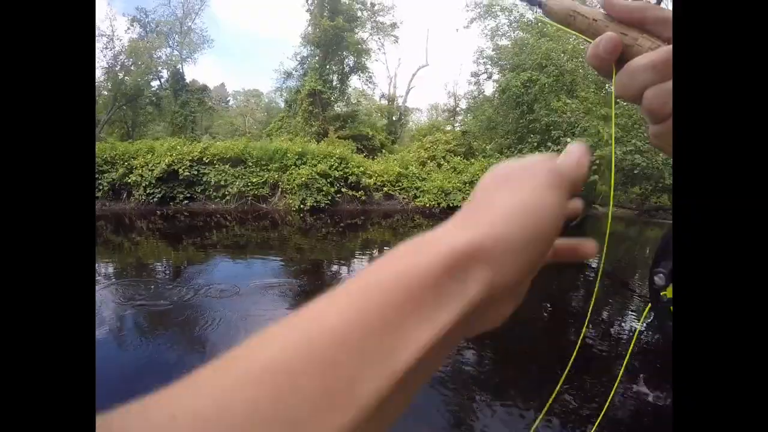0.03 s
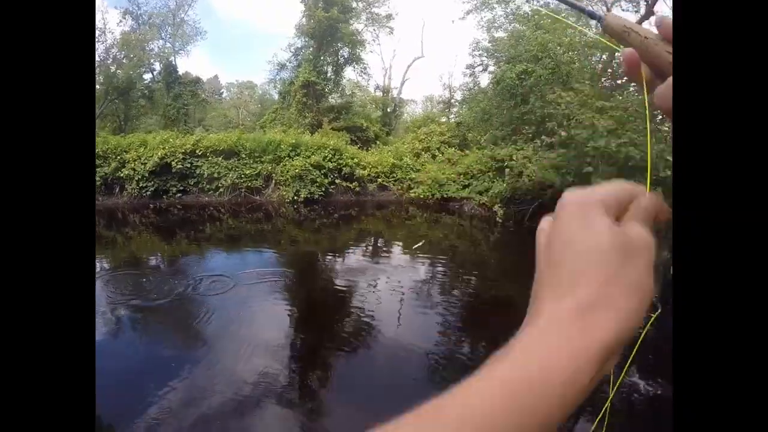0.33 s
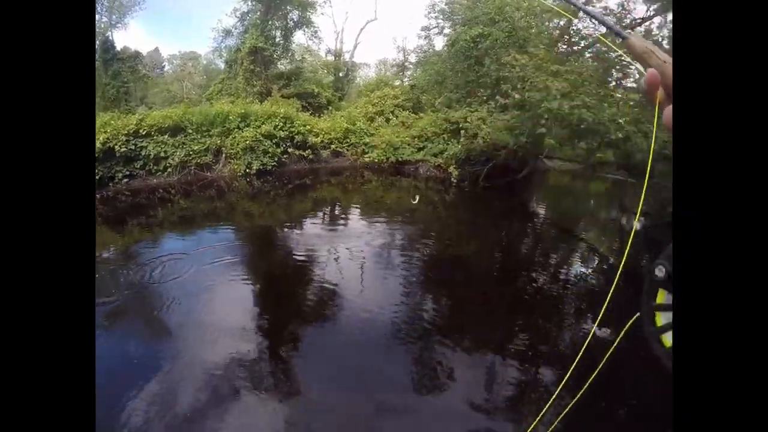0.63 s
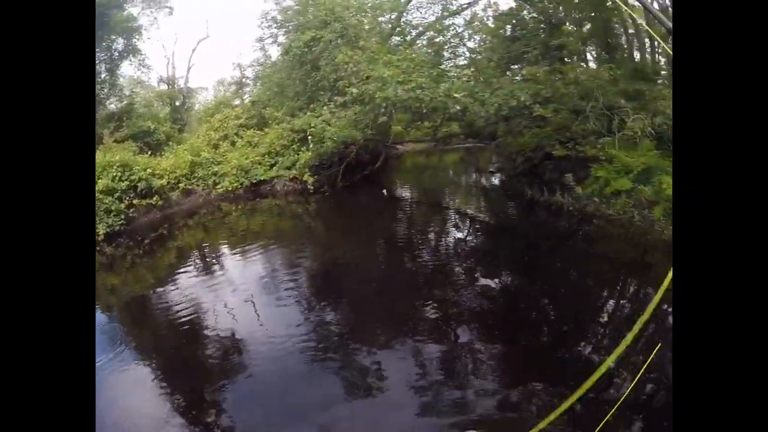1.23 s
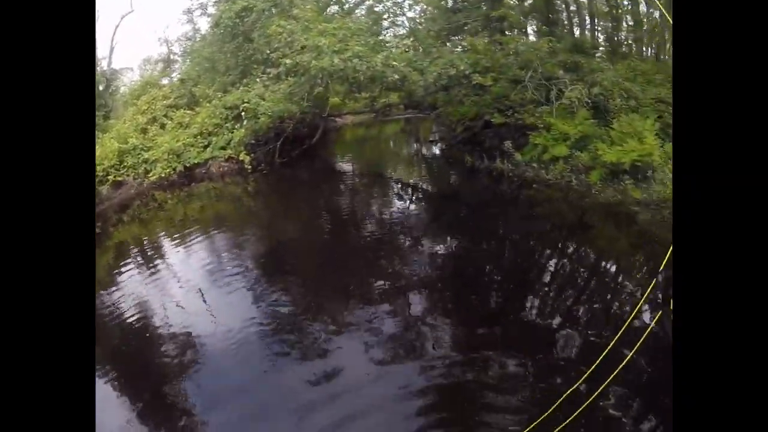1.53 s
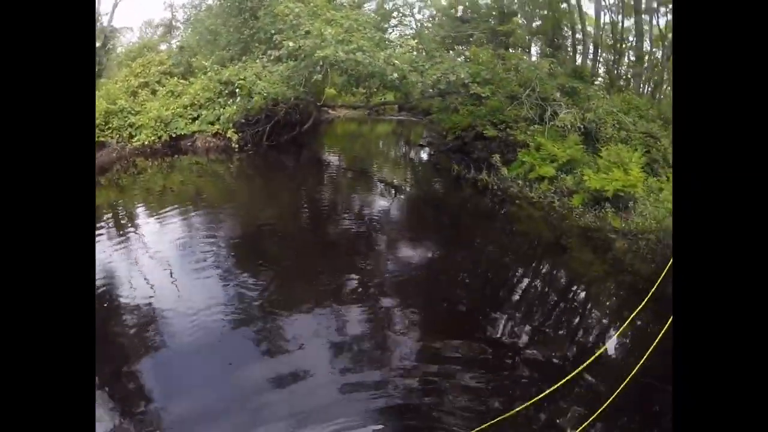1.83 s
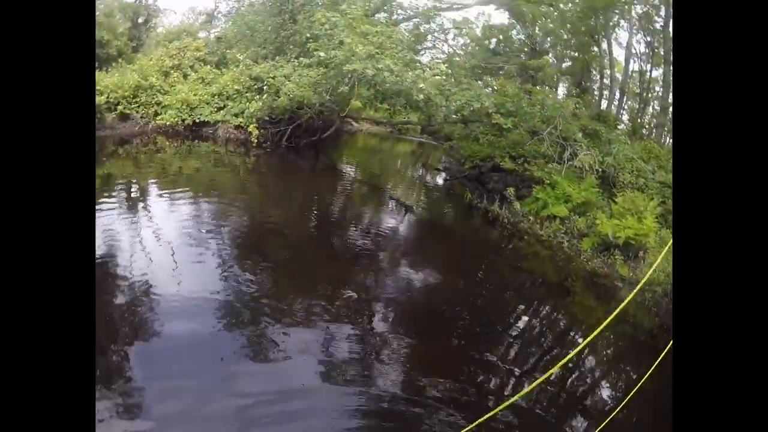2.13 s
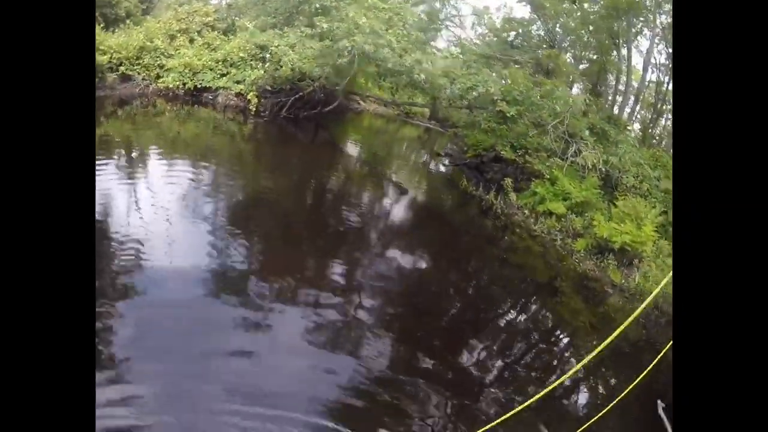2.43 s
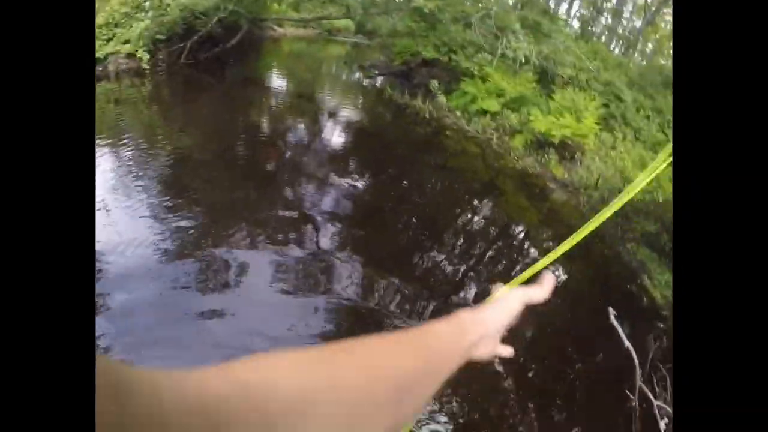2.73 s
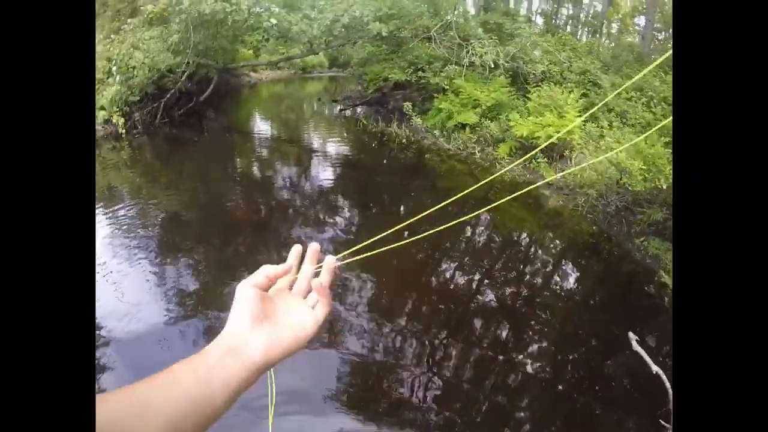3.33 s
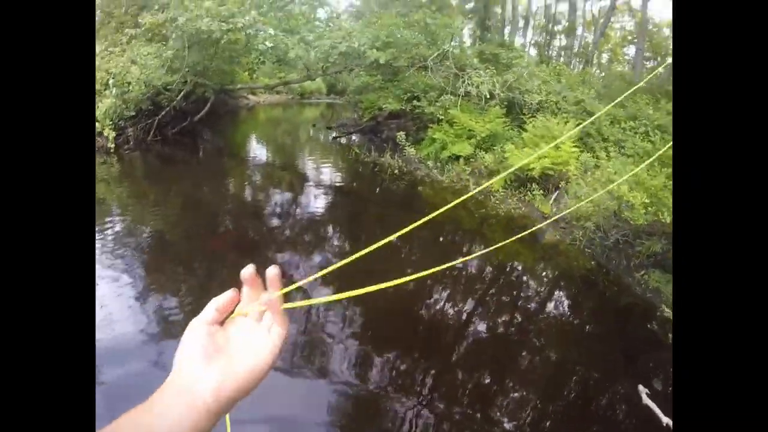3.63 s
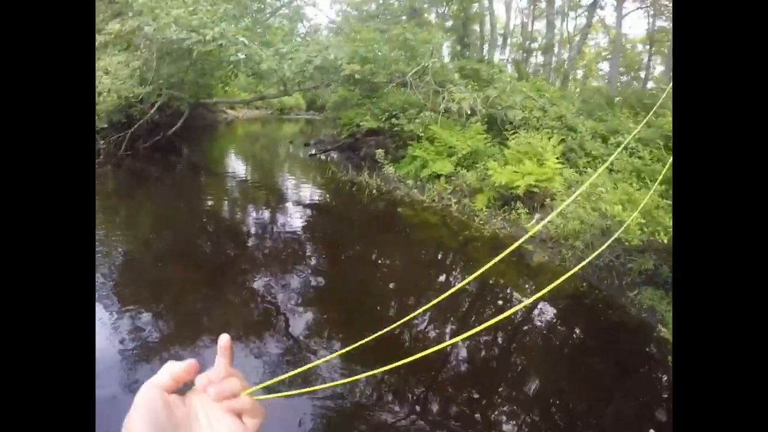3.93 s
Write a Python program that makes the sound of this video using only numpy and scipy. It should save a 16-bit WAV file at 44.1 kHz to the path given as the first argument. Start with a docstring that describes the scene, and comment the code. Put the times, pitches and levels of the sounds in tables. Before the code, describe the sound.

Low thumps and cloth scrapes on a body-worn camera, with soft water behind.

```python
"""Beside a slow stream, an angler handles a fly line, heard from a cased camera worn on the chest.
Body movement and puffs of air thump the case; clothing rubs, scrapes and knocks on it and rings its walls.
The line zips through the fingers and ticks, and a catch on the tackle snaps once.
Behind it all lie a soft wash of water, ringing drips and small bubbles, and a faint whistling bird."""
import sys
import numpy as np
from scipy import signal
from scipy.fft import rfft, irfft, next_fast_len
from scipy.io import wavfile
from scipy.ndimage import uniform_filter1d

SR = 44100
rng = np.random.default_rng(int(sys.argv[2]) if len(sys.argv) > 2 else 0)


def generate_wav(sig):
    """Save sig (samples, or channels by samples) to the path in sys.argv[1] as 16-bit PCM at SR."""
    pcm = np.round(np.clip(np.atleast_2d(sig).T, -1, 1) * 32767).astype(np.int16)
    wavfile.write(sys.argv[1], SR, pcm)


N = 176400

# ring of the case walls under sliding cloth (frequency [Hz], relative level [dB])
CASE_RING = [(150, -29.5), (260, -6), (370, -10), (470, -9), (620, -4), (730, -8.5), (1000, -3),
             (1300, -10.5), (1560, -16), (1800, -7), (2050, 3.5), (2300, 2), (2500, 2), (2780, -12.5),
             (3050, -9.5), (3400, -17), (3850, -18.5), (4150, -11.5), (4400, -19.5), (4800, -5.5),
             (5120, -11), (5380, -28), (5700, -10.5), (6200, -16.5), (6800, -21.5), (7400, -34),
             (8050, -22.5), (8700, -40), (9400, -32), (10050, -25.5), (11000, -35), (12400, -37),
             (15500, -69)]


def undb(db):
    """Decibels to gain."""
    return 10 ** (np.asarray(db) / 20)


def unit(x):
    """Scale to rms 1."""
    return x / np.sqrt(np.mean(x ** 2))


def clock():
    """Time of every sample, in seconds."""
    return np.arange(N) / SR


def fader(points):
    """Gain ride through (time [s], level [dB]) points."""
    return undb(np.interp(clock(), *np.array(points).T))


def colour(x, *spectra):
    """Minimum-phase EQ through one or more curves of (frequency [Hz], gain [dB])."""
    size = next_fast_len(len(x) + 4096, real=True) // 2 * 2
    log_hz = np.log(np.maximum(np.arange(size // 2 + 1) * SR / size, 1))
    db = sum(np.interp(log_hz, np.log(eq[:, 0]), eq[:, 1]) for eq in map(np.array, spectra))
    cepstrum = irfft(np.log(undb(db)), size)
    cepstrum[1:size // 2] *= 2  # folded so that the ring follows the hit
    cepstrum[size // 2 + 1:] = 0
    return irfft(rfft(x, size) * np.exp(rfft(cepstrum)), size)[:len(x)]


def noise(spectrum):
    """Steady coloured noise at rms 1."""
    return unit(colour(rng.standard_normal(N), spectrum))


def wander(rate_hz):
    """Smooth random drift at rms 1."""
    hold = max(int(SR / rate_hz), 1)
    steps = np.repeat(rng.standard_normal(N // hold + 1), hold)
    return unit(uniform_filter1d(uniform_filter1d(steps, hold), hold)[:N])


def add(out, start, x):
    """Mix a short sound in at its start time."""
    i = max(int(start * SR), 0)
    out[i:i + len(x)] += x[:max(N - i, 0)]


def slips(per_second=5000, spread_db=3):
    """Friction: fibres stick and slip in dense impulses of very unequal size."""
    impulses = (rng.random(N) < per_second / SR) * rng.choice([-1, 1], N)
    return impulses * undb(spread_db * np.minimum(rng.exponential(size=N), 5))


def strokes(rows, attack_s=0.0031, sag_db=6.5, release_s=0.00425):
    """Envelope of a series of slides: each grabs quickly, sags and lets go."""
    out = np.zeros(N)
    for start, length, db in rows:
        t = clock() - start
        grab = np.clip(t / attack_s, 0, 1)
        sag = undb(-sag_db * np.clip(t / length, 0, 1))
        release = np.exp(-np.maximum(t - length, 0) / release_s)
        out += undb(db) * grab * sag * release
    return out


def blows(rows, spectrum, decay_s, rough):
    """Contacts ring a body: one firm push, then a brief rough scuff."""
    out, t = np.zeros(N), clock()[:SR // 10]
    for start, db in rows:
        scuff = rng.standard_normal(len(t)) * np.exp(-t / decay_s)
        scuff /= np.sqrt(np.sum(scuff ** 2))
        hit = colour((t == 0) + rough * scuff, spectrum)
        strength = np.sqrt(np.sum(hit ** 2) / (decay_s * SR))
        add(out, start, undb(db) * hit / (2 * strength))
    return out


def bubble(hz, cycles, glide=0.042):
    """One bubble rings and rises a little in pitch as it dies."""
    t = clock()[:SR // 20]
    age = t * hz / cycles
    return np.sin(2 * np.pi * hz * t * (1 + glide * np.minimum(age, 2))) * np.exp(-age)


def stream(level_db=-58):
    """The bed: a soft, steady wash of slow water and microphone hiss."""
    # tone of the water and hiss (frequency [Hz], relative level [dB])
    wash = [(100, -3.5), (450, 2.5), (1000, 2.5), (1550, -9), (2200, 5), (2900, -5.5), (4300, -2.5),
            (5800, -8), (8800, -12), (10000, -9), (11500, -13.5), (13500, -9.5), (15500, -17.5)]
    return undb(level_db) * noise(wash)


def bird(waver_depth=0.003, flutter_db=2.5):
    """Thin, nearly steady whistles from the trees."""
    # bird notes (start [s], length [s], start pitch [Hz], end pitch [Hz], level [dB])
    whistles = [(0.31, 0.216, 3400, 3480, -67), (0.45, 0.036, 3470, 3470, -50),
                (.36, 0.206, 5100, 5650, -68), (0.97, 0.44, 3770, 3580, -66.5)]
    out, waver = np.zeros(N), 1 + waver_depth * wander(150.4)
    for start, length, from_hz, to_hz, db in whistles:
        along = np.clip((clock() - start) / length, 0, 1)
        hz = (from_hz + (to_hz - from_hz) * along) * waver
        swell = np.sqrt(2 * np.abs(np.sin(np.pi * along)))
        out += undb(db) * swell * np.sin(2 * np.pi * np.cumsum(hz) / SR)
    return out * unit(undb(flutter_db * wander(89.4)))


def trickle(from_s=1.65, until_s=3.68, per_band=100, spread_db=2.5):
    """Small bubbles ring as the angler turns in the water, and a few clear drips stand out."""
    # bubble bands (centre pitch [Hz], lowest level [dB], decay [cycles])
    bands = [(1001, -51, 6.4), (2192, -51.5, 9.7), (4300, -49.5, 9)]
    # single drips (time [s], pitch [Hz], level [dB])
    drips = [(1.721, 4820, -45), (1.83, 900, -36.5), (1.855, 4300, -40), (3.325, 800, -40.5),
             (3.122, 4330, -45), (3.39, 995, -38.5), (3.602, 4270, -39)]
    out = np.zeros(N)
    for centre_hz, db, cycles in bands:
        for when, pitch, softness in rng.random((per_band, 3)):
            gain = undb(db - spread_db * np.log(max(softness, 1 / 20)))
            hz = centre_hz * np.exp(pitch - 0.5)
            add(out, from_s + when * (until_s - from_s), gain * bubble(hz, cycles))
    for start, hz, db in drips:
        add(out, start, undb(db) * bubble(hz, cycles=6.1))
    return out


def line_zips():
    """The fly line slips through the fingers in short, bright zips."""
    # pulls of the line (start [s], length [s], level [dB])
    pulls = [(.436, 0.021, -46), (.78, 0.086, -57), (.893, .012, -52), (1.07, 0.1, -53),
             (1.195, 0.0069, -46.5)]
    # tone of line on skin (frequency [Hz], relative level [dB])
    zip_tone = [(1500, -23), (2700, -0.5), (3400, 4.5), (3800, -4.5), (5700, -10), (7000, -21),
                (15000, -33)]
    return unit(colour(slips(), zip_tone)) * strokes(pulls)


def tackle_ticks():
    """Line and tackle touch in small, dry ticks."""
    # light contacts (time [s], level [dB])
    ticks = [(1.015, -41), (1.199, -36.5), (1.394, -39.5), (1.526, -40), (1.738, -35), (1.882, -38),
             (1.970, -38), (2.983, -40), (3.636, -34)]
    # ring of a tick (frequency [Hz], relative level [dB])
    tick_tone = [(300, -61.5), (1000, 2), (1550, -4), (2150, 16), (2750, 0), (3600, -4), (4600, -22),
                 (6200, -11.5), (15000, -40)]
    return blows(ticks, tick_tone, decay_s=0.0036, rough=1.6)


def catch_click(at_s=2.7613, ring_db=-30, snap_db=-34.5, snap_decay_s=0.0007):
    """A catch snaps once and the case rings briefly."""
    # modes of the case (frequency [Hz], relative level [dB], decay [s])
    modes = [(1060, 2, 0.0012), (2160, 2.5, 0.0036), (6670, -2, 0.00087), (7800, -4.5, 0.001),
             (10100, -6, 0.00092)]
    out, t = np.zeros(N), clock()[:SR // 20]
    ring = sum(undb(db) * np.sin(2 * np.pi * hz * t) * np.exp(-t / decay) for hz, db, decay in modes)
    snap = rng.standard_normal(len(t)) * np.exp(-t / snap_decay_s)
    add(out, at_s, undb(ring_db) * ring + undb(snap_db) * snap)
    return out


def shirt_rub(flutter_db=2):
    """The shirt brushes the case, and its slipping fibres ring the walls."""
    # ride of the rubbing (time [s], level [dB])
    ride = [(0, -52), (0.5, -53), (0.62, -56), (0.85, -50.5), (0.88, -56.5), (0.99, -61.5), (1.09, -47),
            (1.23, -59.5), (1.33, -50), (1.47, -55), (1.65, -48.5), (1.78, -51), (1.85, -46.5),
            (1.95, -52.5), (2.3, -48), (2.55, -41.5), (2.75, -44.5), (2.81, -52), (2.91, -47.5),
            (3.3, -51.5), (3.46, -49), (3.65, -41.5), (3.8, -44), (3.87, -46), (3.92, -58)]
    # tone of the shirt, on top of the case ring (frequency [Hz], relative level [dB])
    shirt_tone = [(200, -3.5), (600, 4.5), (950, 9), (1500, 12), (2200, 2), (3300, 6.5), (5000, -4.5),
                  (6500, 3), (10000, 2.5), (15000, -7)]
    friction = slips() * undb(flutter_db * wander(60))
    return unit(colour(friction, CASE_RING, shirt_tone)) * fader(ride)


def case_shudder(flutter_db=4):
    """The case drags on cloth with a low, uneven shudder."""
    # ride of the shudder (time [s], level [dB])
    ride = [(0, -50), (0.98, -50.5), (1.08, -36.5), (1.25, -50.5), (1.6, -51), (2.15, -45), (2.3, -30.5),
            (2.46, -30), (2.52, -23.5), (2.59, -33.5), (2.8, -39), (3.1, -37), (3.38, -55), (3.54, -39.5),
            (3.75, -30.5), (3.88, -41), (4, -62)]
    # tone of the dragging case (frequency [Hz], relative level [dB])
    drag_tone = [(45, -18.5), (85, -1), (112, 3), (150, -15.5), (185, -16.5), (255, -15.5), (350, -26.5),
                 (460, -38.5), (800, -61), (4000, -100)]
    drag = rng.standard_normal(N) * undb(flutter_db * wander(30))
    return unit(colour(drag, drag_tone)) * fader(ride)


def cloth_scrapes(flutter_db=1):
    """Cloth scrapes hard across the case in short, gritty strokes."""
    # hard scrapes (start [s], length [s], level [dB])
    scrapes = [(1.037, 0.0089, -39), (1.632, 0.013, -40.5), (1.8145, 0.0028, -28.5), (1.822, 0.013, -41.5),
               (2.257, 0.005, -28), (2.296, 0.0077, -27.5), (2.358, 0.038, -27), (2.440, 0.029, -26),
               (2.492, 0.041, -23), (3.743, 0.042, -37.5), (3.823, 0.015, -33.5)]
    # tone of a scrape, on top of the case ring (frequency [Hz], relative level [dB])
    scrape_tone = [(200, 0.5), (400, 2), (1000, 0.5), (2200, 1.5), (5000, -3.5), (10000, 0.7), (12400, -1),
                   (15000, 17)]
    friction = slips() * undb(flutter_db * wander(250))
    return unit(colour(friction, CASE_RING, scrape_tone)) * strokes(scrapes)


def mount_knocks():
    """Soft knocks on the mount give a dull, short ring."""
    # bumps on the mount (time [s], level [dB])
    knocks = [(0.342, -30.5), (0.63, -36), (1.039, -27), (1.068, -29.5), (1.101, -31.5), (1.145, -32),
              (1.253, -25.5), (1.395, -28), (1.488, -31), (2.297, -30), (2.354, -22), (2.437, -18),
              (2.497, -16.5), (2.909, -28.5), (2.984, -29), (3.04, -33.5), (3.526, -32.5), (3.55, -29),
              (3.815, -27.5)]
    # body of a knock (frequency [Hz], relative level [dB])
    knock_tone = [(60, -14.5), (130, 4.5), (185, -2), (255, 5.5), (340, -4), (450, -18.5), (600, -14.5),
                  (750, -21.5), (1000, -18), (2400, -32.5), (12000, -65)]
    return blows(knocks, knock_tone, decay_s=0.0066, rough=0.8)


def case_thumps(rumble_db=-26.5, flutter_db=-15, flutter_ref_hz=35.2, fall_over_rise=1.12):
    """Each jolt briefly swings the air in the case and makes it flutter, over a steady rumble."""
    # jolts (peak time [s], swing level [dB], pitch [Hz], rise time [s])
    jolts = [(0.078, -13, 26.6, 0.026), (0.218, -10, 27.6, 0.026), (0.482, -16, 42.8, 0.049),
             (0.832, -15.5, 29.2, 0.044), (1.086, -7.5, 66.3, 0.0083), (1.416, -8, 25.8, 0.034),
             (1.678, -10.5, 46.2, 0.028), (2.016, -7.5, 32.2, 0.03), (2.264, -9, 41.2, 0.017),
             (2.502, -4, 33.2, 0.015), (2.54, -12.5, 109, 0.022), (2.621, -5.5, 22.1, 0.031),
             (2.887, -13, 46.3, 0.015), (3.232, -5.5, 29.2, 0.021), (3.5, -7, 46.1, 0.013),
             (3.736, -13, 32.5, 0.041), (3.814, 0, 26.3, 0.021)]
    # rumble of harness and air (frequency [Hz], relative level [dB])
    rumble_tone = [(12, -13), (26, 5), (40, -1), (60, -15.5), (85, -16.5), (112, -22.5), (150, -28.5),
                   (185, -39.5), (255, -34.5), (330, -41.5), (450, -61), (2000, -110)]
    # puff of air with each jolt (frequency [Hz], relative level [dB])
    puff_tone = [(30, -34), (60, 6), (85, -1.5), (110, -7), (145, -25), (200, -36.5), (400, -52.5),
                 (4000, -110)]
    out = undb(rumble_db) * noise(rumble_tone)
    flutter = undb(flutter_db) * noise(puff_tone)
    for peak_s, db, hz, rise_s in jolts:
        t = clock() - peak_s
        width_s = np.where(t < 0, rise_s, rise_s * fall_over_rise)
        swell = np.exp(-(t / width_s) ** 2)
        swing = np.cos(2 * np.pi * hz * t)
        out += undb(db) * swell * (swing + flutter * hz / flutter_ref_hz)  # quicker swings flutter more
    return out


def scene():
    """Mono mix at the chest: handling noise up front, then tackle, then the stream and its bank."""
    handling = case_thumps() + shirt_rub() + case_shudder() + cloth_scrapes() + mount_knocks()
    tackle = tackle_ticks() + catch_click() + line_zips()
    ambience = bird() + stream() + trickle()
    return (handling + tackle + ambience)[None]


def record(dry, ceiling=1.1, top_hz=15500):
    """The camera rounds off the biggest peaks and cuts the top end."""
    limited = dry / (1 + np.abs(dry / ceiling) ** 8) ** (1 / 8)
    lowpass = signal.ellip(8, 0.2, 80, top_hz, fs=SR, output="sos")
    return signal.sosfilt(lowpass, limited)


dry = scene()
out = record(dry)
generate_wav(out)
```